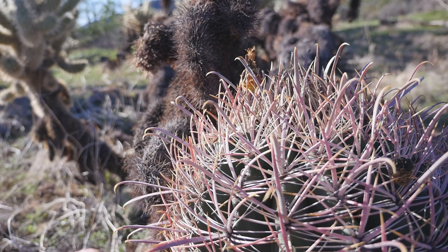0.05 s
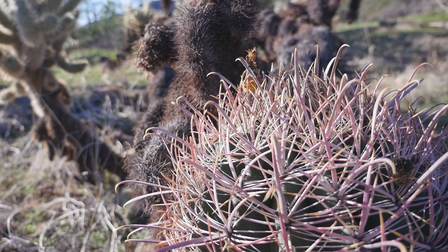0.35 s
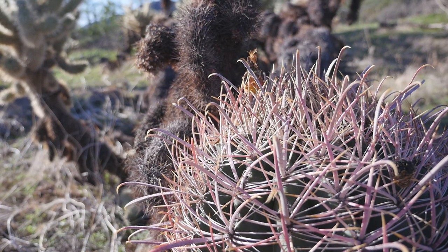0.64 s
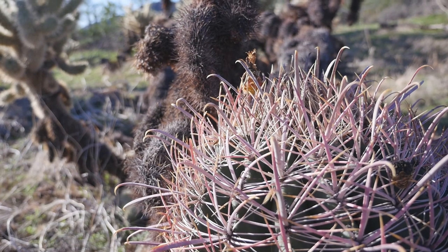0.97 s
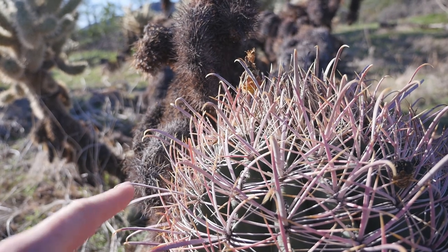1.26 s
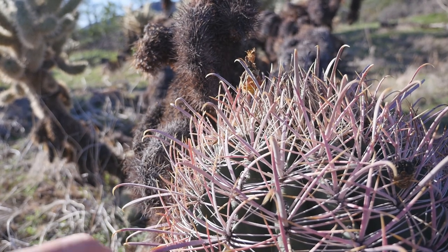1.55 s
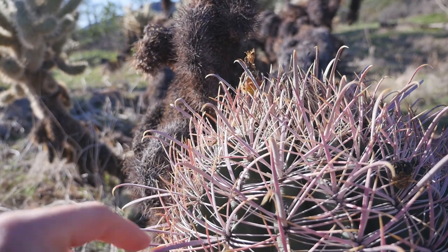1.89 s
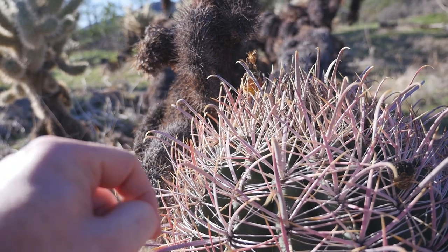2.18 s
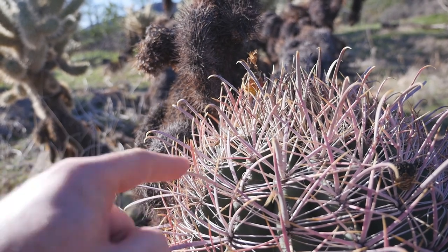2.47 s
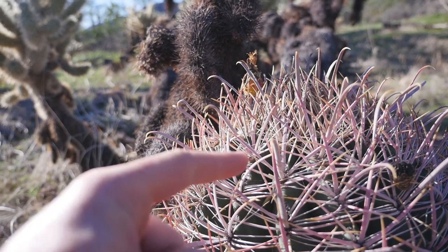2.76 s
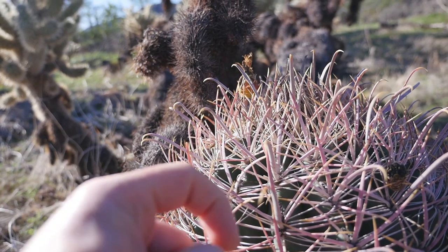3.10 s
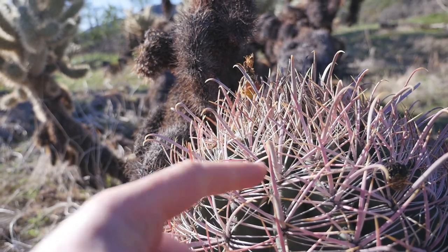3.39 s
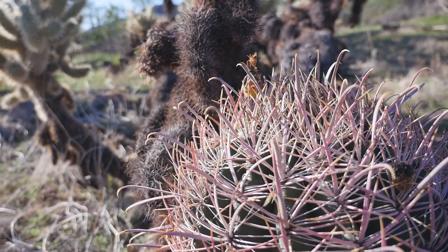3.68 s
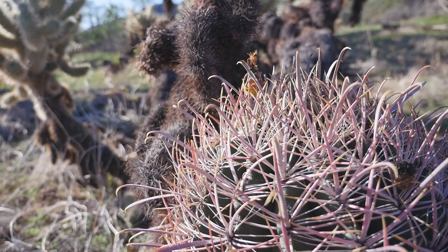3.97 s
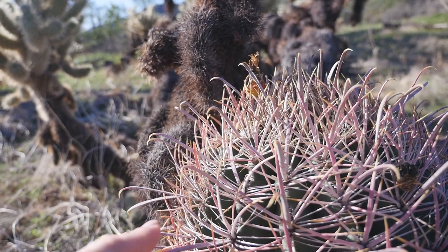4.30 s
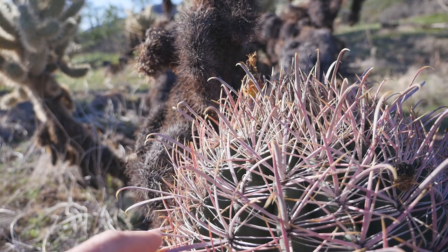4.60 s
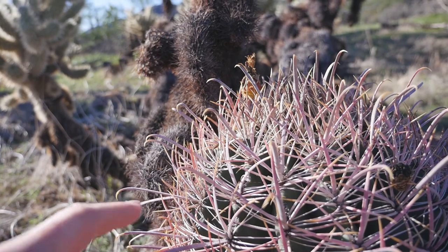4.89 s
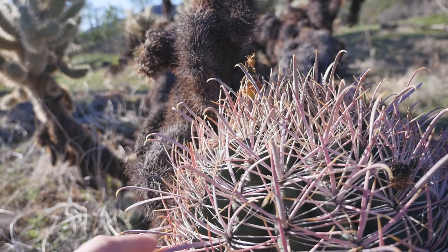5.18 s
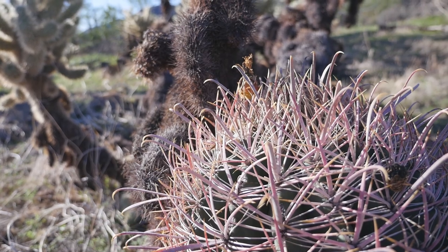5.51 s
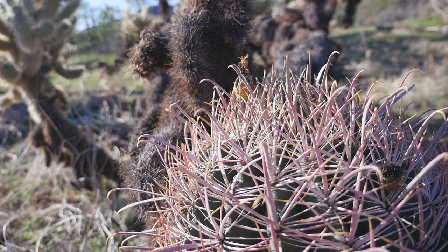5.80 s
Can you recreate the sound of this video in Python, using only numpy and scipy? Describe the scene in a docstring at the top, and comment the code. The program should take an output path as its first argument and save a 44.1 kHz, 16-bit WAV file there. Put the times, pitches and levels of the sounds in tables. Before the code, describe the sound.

A finger plucks stiff cactus spines close to the microphone, outdoors with no echo. Each pluck is a sharp snap followed by a brief buzzing rattle and a faint twang. The first clear one comes at 0.3 seconds, then a dry pop at 0.7 and a duller tap at 1.0. Two bright flicks follow at 1.4 and 1.8, and two cracks with shorter rattles at 2.2 and 2.6. From 2.9 to 3.7 seconds, five plucks come more quickly, about five a second. After a short pause, four more rattling snaps sound at about 4.4, 4.7, 5.1 and 5.3, and a softer pop with a small low twang ends the series at 5.6. A few light ticks fall between the plucks. Underneath, faint wind rumbles and flutters on the microphone over steady low air, swelling slightly around 5 to 5.5 seconds.

```python
"""The stiff spines of a barrel cactus, plucked by a finger close to the microphone, outdoors.
Each spine slips off the finger with a snap, then swings with a faint hum and taps its neighbours once a
swing until it no longer reaches them. The thicket of spines rings briefly in sympathy; the open ground
gives no echo. Light ticks and faint swells of hiss fall between plucks. Underneath, faint wind rumbles
and flutters on the microphone over steady air."""
import sys
import numpy as np
from scipy import signal
from scipy.fft import rfft, irfft
from scipy.io import wavfile
from scipy.ndimage import uniform_filter1d

SR = 44100
rng = np.random.default_rng(int(sys.argv[2]) if len(sys.argv) > 2 else 0)


def bounce(signal):
    """Save signal as a 16-bit WAV file at the path given by the first command-line argument."""
    frames = np.transpose(np.atleast_2d(signal))
    limited = np.clip(frames, -1, 1)
    pcm = np.round(limited * 32767).astype(np.int16)
    wavfile.write(sys.argv[1], SR, pcm)


N = 257984
SIZE = 16384  # samples in one short sound
AGE = np.arange(SIZE) / SR
FREQ = np.fft.rfftfreq(SIZE, 1 / SR) + 1

# Plucks, close to the microphone. Each row: release in seconds, spine, kind of snap, relative snap level
# in dB, snap decay in seconds, treble cutoff in Hz, relative swing level in dB, rattle length in seconds.
PLUCKS = [(-.115, "long", "slip", 0, .003, 14000, 9.5, 0.15),
          (0.2896, "long", "slip", 1.5, 0.0029, 16000, 7, .17),
          (0.6766, "short", "pop", .5, .001, 18000, -7.5, 0.011),
          (1.0493, "short", "tock", -3.5, 0.0013, 4400, -5.5, 0.067),
          (1.4476, "long", "flick", -2, 0.0011, 18300, 4.5, .14),
          (1.783, "long", "flick", 0, 0.00098, 16000, 4.5, .16),
          (2.1903, "short", "crack", -2, .005, 18000, 8.5, 0.061),
          (2.5561, "short", "crack", -2, 0.0032, 17960, 9.5, .054),
          (2.93, "middle", "knock", 0, 0.0037, 12900, 9.5, .13),
          (3.1265, "middle", "knock", 2.5, 0.0026, 16000, 0, 0.061),
          (3.3162, "middle", "knock", -3.5, .0034, 8980, 7.5, .12),
          (3.505, "middle", "knock", 0, 0.0027, 12000, 8.5, .14),
          (3.735, "long", "flick", 1.5, 0.0017, 15200, 1.5, .15),
          (4.391, "long", "slip", -6, 0.0021, 11000, 6, .15),
          (4.6529, "long", "slip", .5, 0.0035, 15050, 5, .15),
          (5.055, "long", "slip", -1.5, 0.003, 14120, 6, .16),
          (5.253, "long", "slip", 1, 0.0024, 18060, 6.5, .16),
          (5.581, "stiff", "pop", -6, 0.0012, 5300, -12, 0.061)]
# Resonances of the spines. Each row: centre in Hz, nominal width in Hz, relative level in dB.
LONG_SPINE = [(820, 1300, -11.5), (1286, 140, -6.5), (2167, 130, 0.66), (2700, 210, -5.5), (3400, 450, -5),
              (4340, 150, -3), (4877, 300, -4), (6140, 620, -5), (7690, 190, -1.6), (8300, 850, -8.5),
              (11430, 250, -9), (13240, 260, -9), (14200, 880, -11.5)]
MIDDLE_SPINE = [(694, 550, -16), (980, 52, -14), (1660, 320, -6.5), (2300, 560, -7.5), (3254, 240, -4.5),
                (4172, 690, -6), (4950, 650, -2), (5670, 344, -4.5), (7020, 274, -21), (8287, 910, -8.5),
                (12520, 450, -14), (14720, 1800, -17)]
SHORT_SPINE = [(397, 225, -10.5), (1057.4, 72, -16), (1780, 510, -2.5), (2280, 420, -4), (3110, 330, -2.5),
               (3830, 291, -7), (5440, 520, -8), (5630, 341, -6.5), (6800, 690, -5), (8560, 710, -7.5),
               (12110, 480, -15.5), (14309, 710, -2)]
# Overtones of the long, middle, short and stiff spine.
# Each row: multiple of the swing rate, relative level in dB.
HUM = [(1, 1), (2, -8.5), (3, -13.5), (5, -23), (6, -18.5), (7, -9), (8, -18), (9, -18), (10, -21),
       (11, -21), (13, -19)]
MIDDLE_HUM = [(2, 2), (6, -7.5), (7, -2.5), (9, -7.5), (10, 0)]
SHORT_HUM = [(3, 1), (6, -6.5)]
STIFF_HUM = [(1, 3), (2, -8), (3, -10), (5, -19.5), (6, -22)]
# The spines. Each row: resonances, overtones, swing rate in Hz, return graze against the tap in dB,
# relative hum level in dB, seconds for the hum to fall 60 dB.
SPINES = {"long": (LONG_SPINE, HUM, 124.5, -3, -36.5, .27),
          "middle": (MIDDLE_SPINE, MIDDLE_HUM, 102, -3.5, -49, 0.26),
          "short": (SHORT_SPINE, SHORT_HUM, 149.6, -3, -45.5, 0.15),
          "stiff": (SHORT_SPINE, STIFF_HUM, 181, 1.5, -14.5, .25)}
# Resonances of each snap, set by the way the spine leaves the finger.
# Each row: centre in Hz, nominal width in Hz, relative level in dB.
FLICK = [(792, 130, 6), (1290, 120, 19.5), (2205, 270, 25), (3210, 450, 15.5), (7500, 940, 16),
         (9000, 11000, 5.5), (14100, 2200, 9)]
SLIP = [(353, 154, 10.2), (790, 78, 12.8), (1320, 370, 5.5), (2060, 190, 10.7), (3150, 320, 9.8),
        (4430, 1800, 5.2), (7740, 1000, 9.9), (14100, 3800, 5.4)]
KNOCK = [(1490, 150, 17.3), (1790, 190, 15), (2380, 230, 16.5), (3700, 900, 9.5), (5300, 1500, 11),
         (8400, 800, 8), (11000, 9300, 2.8)]
TOCK = [(1400, 310, 15), (1790, 250, 20), (8500, 6000, 10)]
CRACK = [(440, 150, 5), (930, 120, 5.1), (1450, 180, 13), (2220, 380, 16), (3830, 1300, 19),
         (6150, 900, 16), (9150, 9300, 10)]
POP = [(577, 330, 13), (1125, 260, 14), (1870, 260, 19), (2920, 330, 12), (4660, 480, 22), (6000, 1100, 16),
       (8780, 900, 18), (13600, 2200, 15)]
# Kinds of snap. Each row: resonances, scrape in dB, rebound in dB, both against the release.
SNAPS = {"flick": (FLICK, -26.5, -9), "slip": (SLIP, -19.5, -3), "knock": (KNOCK, -7, -1),
         "tock": (TOCK, -22, -11), "crack": (CRACK, -11, -5.5), "pop": (POP, -14.5, -3.5)}
# Light ticks among the spines.
# Each row: start in seconds, centre in Hz, nominal width in Hz, energy in dB, decay in seconds.
TICKS = [(0.655, 4250, 7130, -14.5, .007), (0.8783, 1990, 2080, -18.5, .0008),
         (0.8923, 1350, 1880, -13.5, 0.001), (2.902, 4500, 6120, -19, 0.0042),
         (3.1646, 4820, 4000, -10, .0012), (3.1738, 4920, 3970, -14.5, 0.0019),
         (4.547, 3900, 12170, -17.5, 0.005), (4.555, 2240, 2510, -16.5, 0.0096),
         (5.604, 7350, 3500, -13, .002)]
# Faint swells of hiss. Each row: start in seconds, length in seconds, relative level in dB.
HISS_SWELLS = [(0.76, 0.29, -65), (2.301, 0.23, -70), (2.871, 0.081, -45.5)]
# Wind on the microphone. Each row: time in seconds, relative rumble in dB, relative flutter in dB.
WIND = [(0.0, -49.5, -50), (0.39, -47.5, -47.5), (0.62, -53, -49), (1.11, -47.5, -50), (1.37, -51, -40),
        (1.66, -44, -44.5), (1.82, -48.5, -50), (2.26, -51.5, -57), (3.54, -51.5, -50), (3.8, -48.5, -47),
        (4.17, -50, -54.5), (4.89, -39.5, -51), (5.25, -36.5, -42.5), (5.42, -36, -46), (5.7, -42.5, -50),
        (5.85, -44.5, -51)]
# Steady air over open ground. Each row: frequency in Hz, noise density in dB per Hz.
AIR = [(30, -67.5), (70, -69), (150, -77.5), (300, -79.5), (500, -89.5), (800, -95), (1300, -103.4),
       (2500, -107.9), (5000, -111.5), (9000, -113.6), (15000, -114.8)]


def cactus(snap_db=1, rattle_db=0.43):
    """Up close, each pluck is a snap, then a swing that rattles and hums; light ticks fall between."""
    out = np.zeros(N)
    for s, spine, kind, force_db, decay_s, dull_hz, swing_db, length_s in PLUCKS:
        body, overtones, swing_hz, graze_db, hum_db, hum_t60 = SPINES[spine]
        click, lead_s = snap(decay_s, body, *SNAPS[kind])
        add(out, s - lead_s, undb(snap_db + force_db) * dull(click, dull_hz))
        add(out, s, undb(swing_db + rattle_db) * rattle(body, graze_db, swing_hz, length_s))
        add(out, s, undb(swing_db + hum_db) * hum(swing_hz, overtones, hum_t60))
    for s, hz, width, db, decay_s in TICKS:
        add(out, s, undb(db) * tick(hz, width, decay_s))
    return out


def snap(decay_s, body, snap_modes, scrape_db, rebound_db, body_db=8, lead_s=0.0034, rebound_s=0.0026):
    """The tip scrapes over the skin, lets go and rebounds; where it was held decides which modes ring."""
    modes = snap_modes + [(hz, width, db + body_db) for hz, width, db in body]
    scrape = unit(rng.standard_normal(SIZE) * AGE * (AGE < lead_s))
    release = np.roll(chatter(decay_s), int(lead_s * SR))
    rebound = np.roll(chatter(decay_s), int((lead_s + rebound_s) * SR))
    slip = whiten(undb(scrape_db) * scrape + release + undb(rebound_db) * rebound)
    return ring(slip, modes, steep=1.4), lead_s


def rattle(body, graze_db, swing_hz, length_s, contact_s=0.0017, grit_db=-7, linger_db=-14):
    """The spine strikes a neighbour on each swing and grazes another on the way back."""
    front = taps(swing_hz, length_s, turn=0.92, jitter_s=0.00007)
    back = undb(graze_db) * taps(swing_hz, length_s, turn=1.2, jitter_s=0.00037)
    blows = sum(signal.fftconvolve(train, chatter(contact_s))[:SIZE] for train in (front, back))
    # no two contacts are quite alike: part of each is fresh grit
    pressure = signal.lfilter([1], [1, -np.exp(-1 / (contact_s * SR))], front + back)
    grit = pressure * rng.standard_normal(SIZE)
    buzz = unit(ring(unit(blows) + undb(grit_db) * unit(grit), body))
    # the taps pump the strongest mode, which builds up and fades with the swing
    hz, width, db = max(body, key=lambda mode: mode[2])
    swell = np.sqrt(AGE) * np.clip(1 - AGE / (1.17 * length_s), 0, 1) ** 2
    linger = unit(ring(swell * rng.standard_normal(SIZE), [(hz, 1.4 * width, db)]))
    return buzz + undb(linger_db) * linger


def taps(swing_hz, length_s, turn, jitter_s, scatter_db=1.77, kick=0.37, kick_s=0.022, hurry=0.07):
    """One tap a swing, the first after `turn` swings: hard, then weaker until the spine falls short."""
    times = np.arange(turn, length_s * swing_hz) / swing_hz
    jitter, scatter = rng.standard_normal((len(times), 2)).T
    wide_swing = np.exp(-times / kick_s)
    force = (1 - times / length_s) ** 1.7 * (1 + kick * wide_swing)
    # the first wide swings are cut short by the neighbour, so they come a little faster
    times = times - hurry * kick_s * (1 - wide_swing) + jitter_s * jitter
    train = np.zeros(SIZE)
    train[np.rint(times * SR).astype(int)] = force * undb(scatter_db * scatter)
    return train


def hum(swing_hz, overtones, t60, rise_s=0.003):
    """The twang of the swing: a weak low note, rich in overtones because the spine keeps striking."""
    tone = sum(undb(db) * np.sin(2 * np.pi * k * swing_hz * AGE) for k, db in overtones)
    return tone * undb(-60 * AGE / t60) * (1 - np.exp(-AGE / rise_s))


def tick(hz, width, decay_s):
    """A light contact among the spines, coloured by one broad resonance."""
    mode = [(hz, width, 0)]
    return unit(ring(ring(chatter(decay_s), mode), mode))


def chatter(decay_s):
    """One contact: a quickly dying cluster of tiny slips."""
    return whiten(rng.standard_normal(SIZE) * np.exp(-AGE / decay_s), bins=120)


def ring(x, modes, steep=1):
    """A short sound rings a body's resonances; steep deepens the valleys between them."""
    power = sum(undb(db) ** 2 * resonance(FREQ, hz, width * np.sqrt(steep)) ** steep
                for hz, width, db in modes)
    # minimum phase: the body rings only after it is struck
    cepstrum = irfft(np.log(power) / 2)
    cepstrum[1:SIZE // 2] *= 2
    cepstrum[SIZE // 2 + 1:] = 0
    return irfft(rfft(x) * np.exp(rfft(cepstrum)))


def dull(x, hz):
    """A softer contact loses the treble above hz."""
    return signal.sosfilt(signal.butter(2, hz, fs=SR, output="sos"), x)


def thicket(x, t60=0.1, level_db=-16, rise_s=0.0068):
    """The direct sound, with the neighbouring spines ringing on for a moment."""
    envelope = undb(-60 * AGE / t60) * (1 - np.exp(-AGE / rise_s))
    tail = unit(rng.standard_normal(SIZE) * envelope)
    return x + undb(level_db) * signal.fftconvolve(x, tail)[:N]


def hiss_swells(hz=2600, width=4500, grain_db=4):
    """A faint, grainy hiss swells and fades, twice between plucks and once just before a pluck."""
    hiss = noise(lambda f: np.sqrt(resonance(f, hz, width))) * undb(grain_db * wander(380))
    envelope = np.zeros(N)
    for s, length_s, db in HISS_SWELLS:
        add(envelope, s, undb(db) * np.hanning(int(length_s * SR)))
    return hiss * envelope


def wind(rumble_trim_db=0.55, flutter_trim_db=-0.2, gust_db=2.02):
    """Soft gusts rumble and flutter on the microphone."""
    s, rumble_db, flutter_db = np.transpose(WIND)
    t = np.arange(N) / SR
    rumble = noise(lambda f: resonance(f, hz=128, width=120) ** 2)
    rumble *= undb(np.interp(t, s, rumble_db) + rumble_trim_db + gust_db * wander(20))
    flutter = noise(lambda f: resonance(f, hz=205, width=280) ** 2)
    flutter *= undb(np.interp(t, s, flutter_db) + flutter_trim_db + gust_db * wander(25))
    return rumble + flutter


def air():
    """The steady background of the place: a low rush with a faint hiss on top."""
    hz, db = np.transpose(AIR)
    freq = np.fft.rfftfreq(N, 1 / SR) + 1
    gain = undb(np.interp(np.log(freq), np.log(hz), db)) * np.sqrt(SR / 2)
    return irfft(rfft(rng.standard_normal(N)) * gain, N)


def resonance(freq, hz, width):
    """Power response of one resonance."""
    return 1 / (1 + ((freq ** 2 - hz ** 2) / (freq * width)) ** 2)


def whiten(x, bins=60):
    """Give a short burst an even spectrum and an energy of one."""
    spectrum = rfft(x)
    smooth_power = uniform_filter1d(np.abs(spectrum) ** 2, bins)
    burst = irfft(spectrum / np.sqrt(smooth_power))
    return unit(burst * (AGE < AGE[SIZE // 4]))


def noise(gain_of_hz):
    """Noise of rms one, shaped by a gain at each frequency."""
    freq = np.fft.rfftfreq(N, 1 / SR) + 1
    return unit(irfft(rfft(rng.standard_normal(N)) * gain_of_hz(freq), N)) * np.sqrt(N)


def wander(rate_hz):
    """Random levels, drawn at rate_hz and smoothed twice, with a spread of one."""
    hold = int(SR / rate_hz)
    steps = np.repeat(rng.standard_normal(N // hold + 1), hold)
    smooth = uniform_filter1d(uniform_filter1d(steps, hold), hold)[:N]
    return smooth / np.std(smooth)


def undb(db):
    """Decibels to gain."""
    return 10 ** (np.asarray(db) / 20)


def unit(x):
    """Scale to an energy of one."""
    return x / np.sqrt(np.sum(x ** 2) + 1e-18)


def add(track, s, sound):
    """Mix a sound in at s seconds; it may have begun before the track does."""
    start = int(s * SR)
    part = sound[max(-start, 0):N - start]
    track[max(start, 0):max(start, 0) + len(part)] += part


def scene():
    """One microphone close to the cactus, in the open air."""
    return (thicket(cactus()) + hiss_swells() + wind() + air())[None]


def record(dry):
    """The recorder clips at full scale and cuts the treble above 16.2 kHz."""
    lowpass = signal.ellip(10, 0.2, 80, 16200, fs=SR, output="sos")
    return signal.sosfilt(lowpass, np.clip(dry, -1, 1))


dry = scene()
out = record(dry)
bounce(out)
```